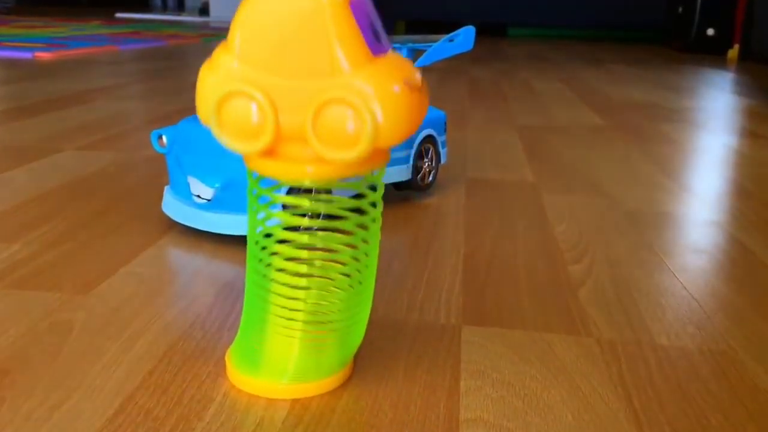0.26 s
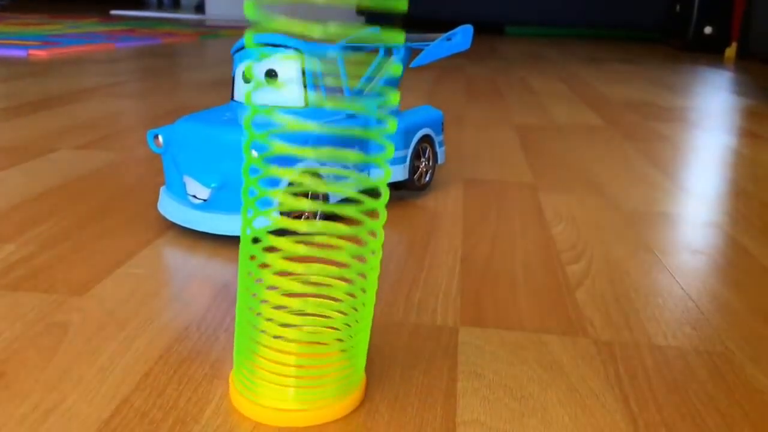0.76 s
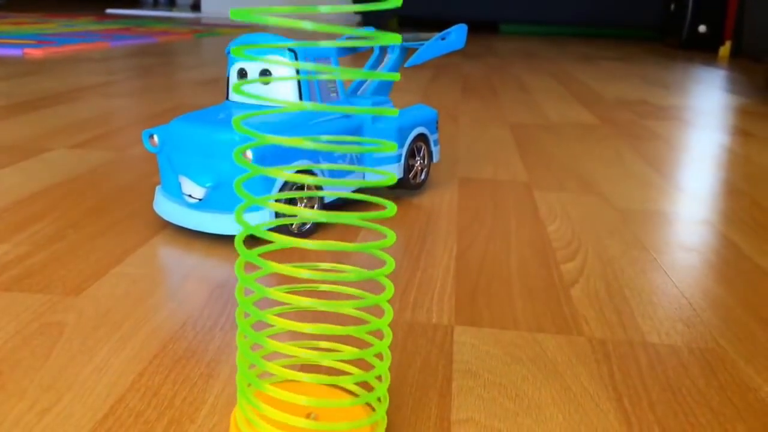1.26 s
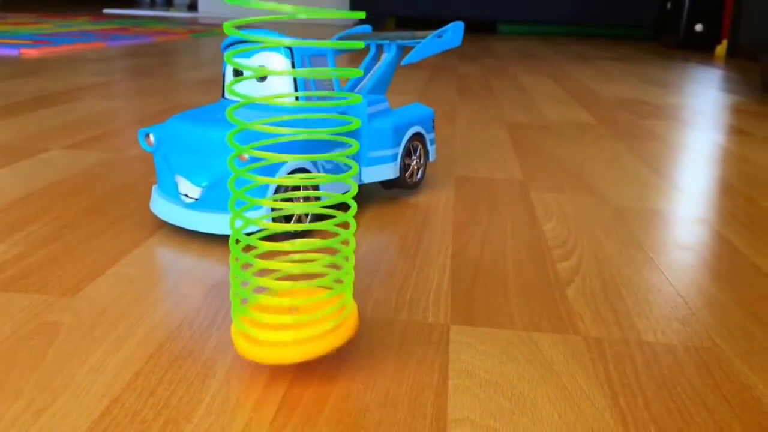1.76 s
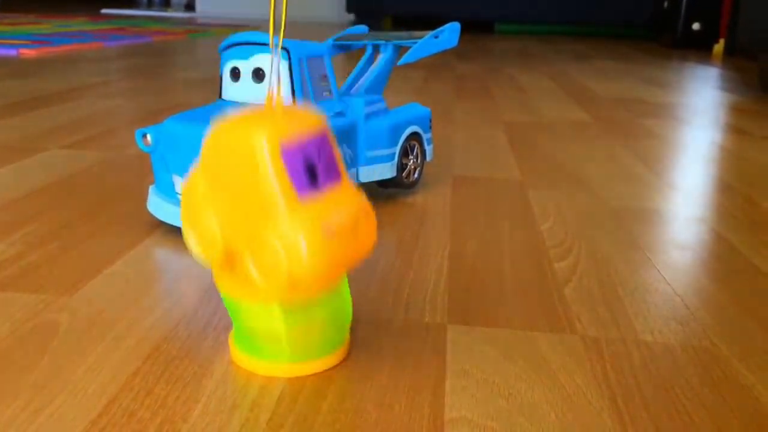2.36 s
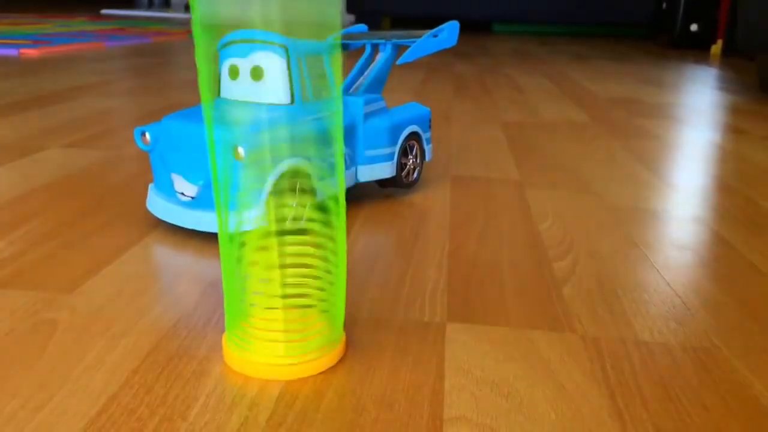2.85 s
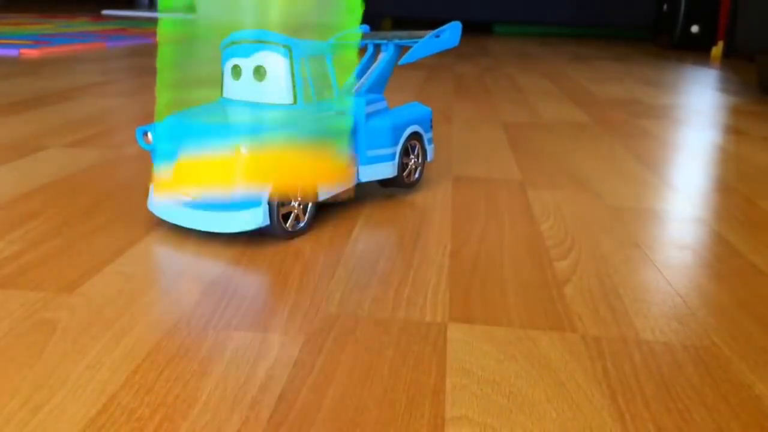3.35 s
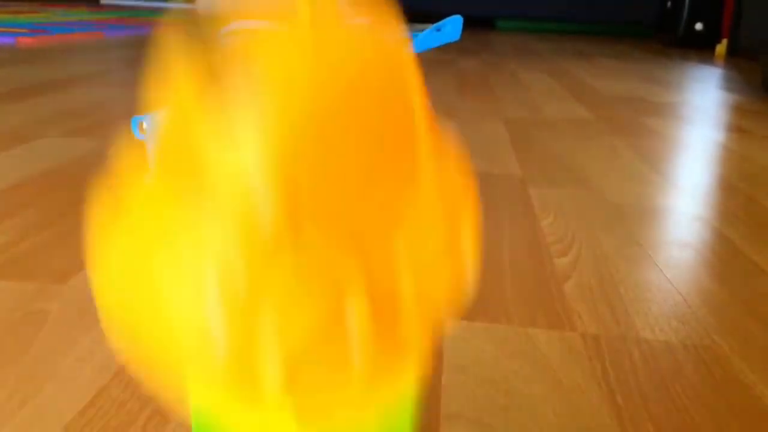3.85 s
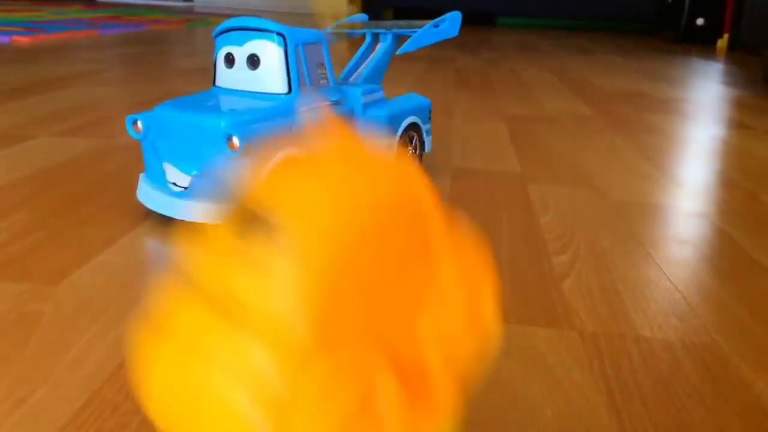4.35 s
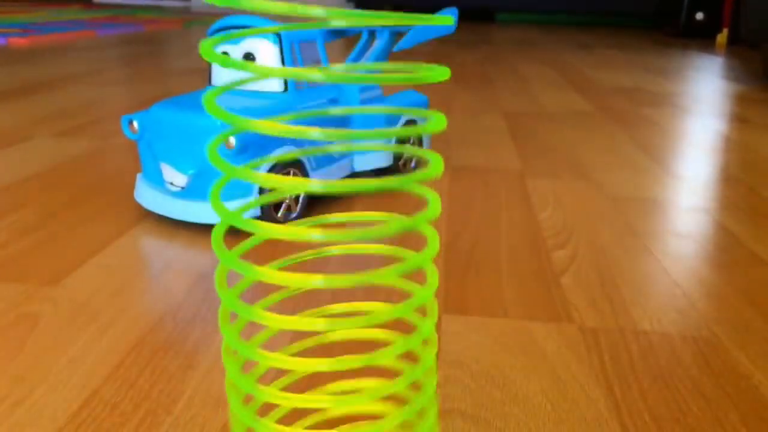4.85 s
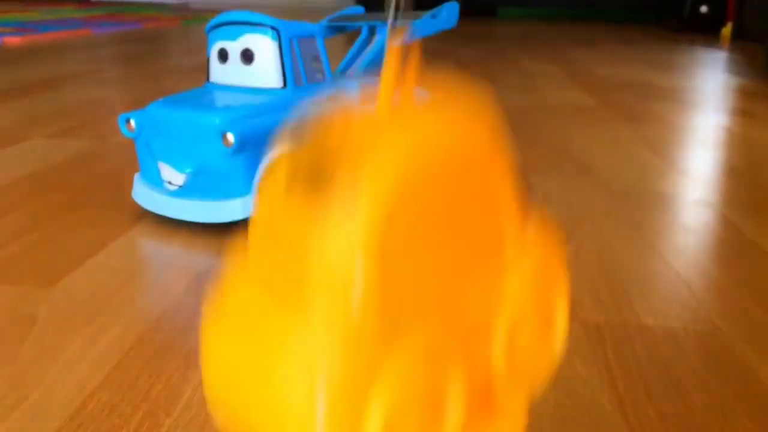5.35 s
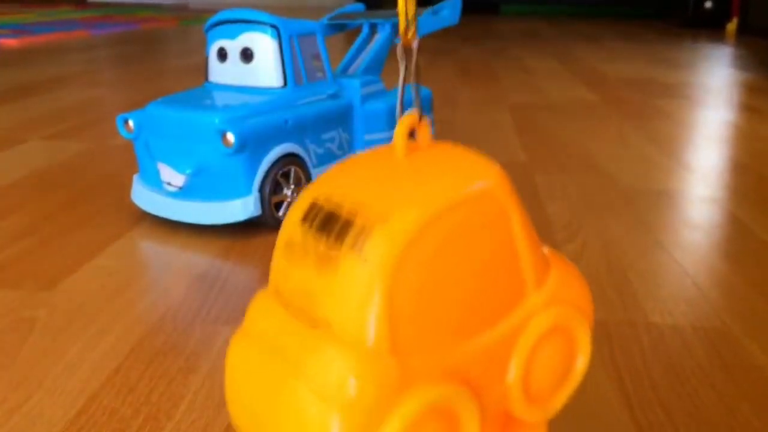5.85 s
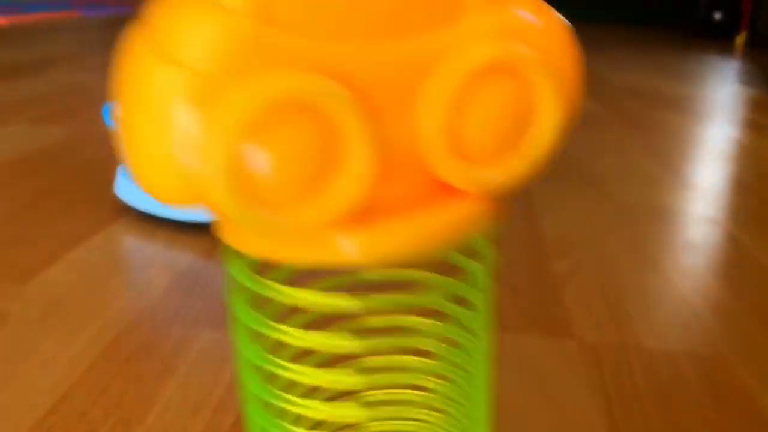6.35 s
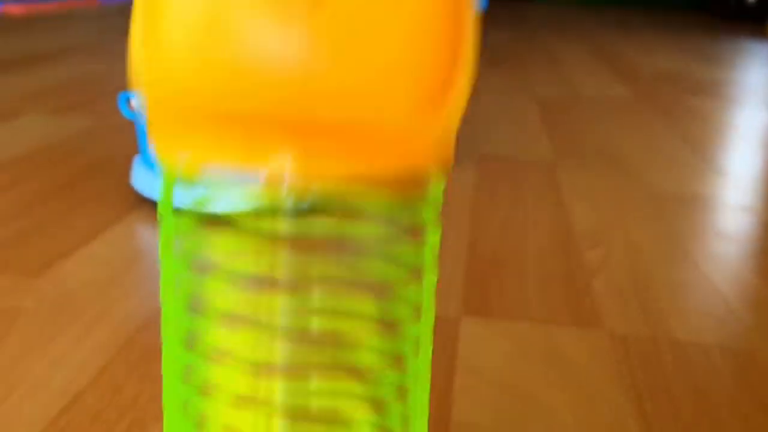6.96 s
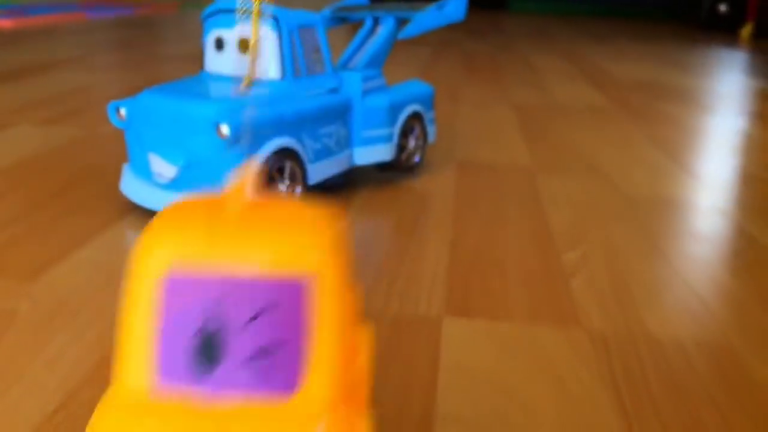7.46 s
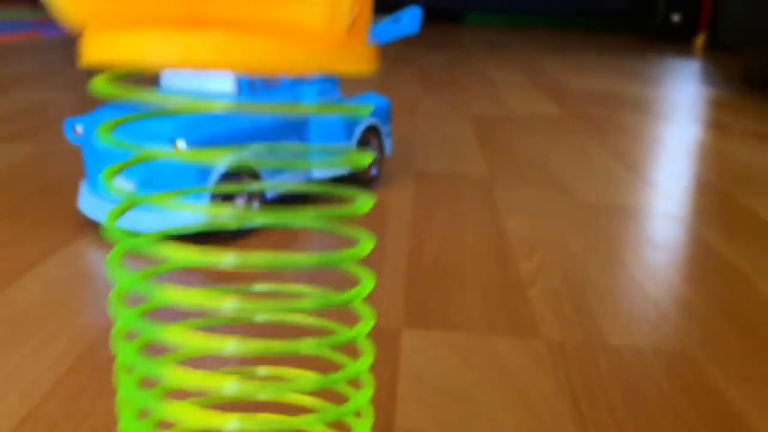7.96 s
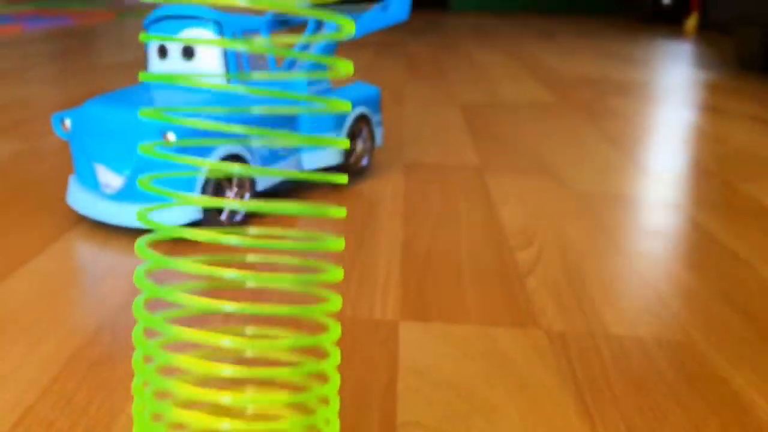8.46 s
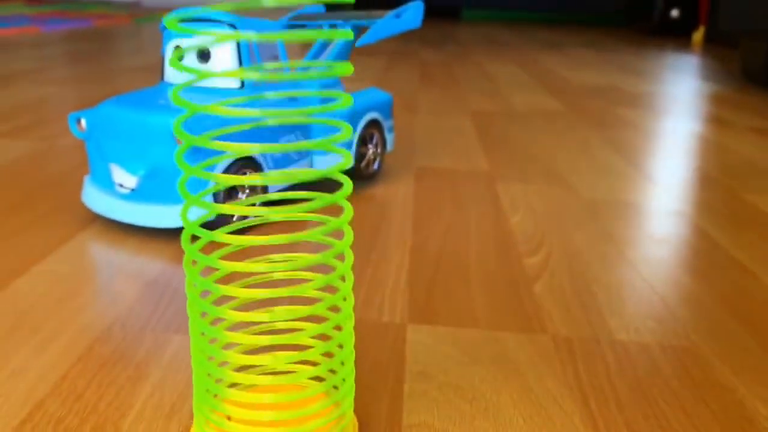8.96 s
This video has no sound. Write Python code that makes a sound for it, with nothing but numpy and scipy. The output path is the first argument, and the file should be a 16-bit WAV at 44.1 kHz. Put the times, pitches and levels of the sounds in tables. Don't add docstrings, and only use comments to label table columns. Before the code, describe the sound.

Close hollow knocks, coil rattles and dragging scrapes of a plastic spring toy on bare boards, in a rumbling room with distant chirps.

```python
import sys
import numpy as np
from scipy import signal
from scipy.io import wavfile
from scipy.ndimage import uniform_filter1d

SR = 44100
rng = np.random.default_rng(int(sys.argv[2]) if len(sys.argv) > 2 else 0)


def linear_from_db(decibels):
    return 10 ** (np.asarray(decibels, float) / 20)


def master_out(mix):
    frames = np.transpose(np.atleast_2d(mix))
    ceiling = np.clip(frames, -1, 1)
    pcm = np.round(ceiling * 32767).astype(np.int16)
    wavfile.write(sys.argv[1], SR, pcm)


N = 406602

# (frequency [Hz], density [dB per Hz])
ROOM_SPECTRUM = [(12, -62.5), (20, -25.5), (38, -34.5), (59, -1), (76, -6), (161, -10), (213, -17.5),
                 (305, -15.5), (351, -29.5), (414, -26.5), (647, -28), (764, -31), (1130, -31),
                 (3340, -51.5), (15400, -61.5)]
# (frequency [Hz], width [Hz], level [dB])
STANDING_WAVES = [(76.6, 11, -41.5), (94, 3.2, -55), (298.2, 64, -60.5), (429, 79, -55.5)]
# (frequency [Hz], time to fall 60 dB [s])
ROOM_DECAY = [(250, 0.3), (1000, 0.4), (4000, 0.23), (14000, 0.2)]

# (frequency [Hz], width [Hz], level [dB])
BASE_MODES = [(580, 170, 2), (476, 88, -6.5), (910, 268, -3.5), (1425, 140, -19), (1871, 1900, -30)]
# (frequency [Hz], width [Hz], level [dB])
SHELL_MODES = [(2450, 970, -2), (3300, 240, -10), (4250, 754, -2), (5900, 3000, -3)]
# (frequency [Hz], width [Hz], level [dB])
GRIT_MODES = [(7300, 5900, -2), (9175, 1100, -10), (11600, 1300, -7.5), (14150, 1300, -17)]

# (time [s], pressure [dB], speed as brightness [dB])
DRAG_PATHS = [
    [(.45, -67, -1), (.55, -52, 1), (.72, -49.5, 0), (.78, -44, 1.5), (1.13, -39, -1), (1.18, -45, 6.5),
     (1.3, -52.5, 10), (1.42, -67, 14)],
    [(2.85, -72, -3), (3.04, -41.5, -6.5), (3.1, -45.5, -16), (3.16, -56, -14)],
    [(6.42, -59, -8.5), (6.5, -47.5, 0.5), (6.7, -47.5, 5), (6.91, -38.5, -0.5), (6.98, -50, 6),
     (7.04, -46.5, 6.5), (7.14, -42, 3.5), (7.22, -65, 4)],
    [(8.18, -57.5, 5), (8.37, -53, -2), (8.41, -42.5, -2.5), (8.47, -36.5, -1), (8.55, -32, -2.5),
     (8.7, -31, -2), (8.84, -34.5, -3.5), (8.93, -42, -4), (9.05, -62, 3)],
]
# (start [s], end [s], frequency [Hz], width [Hz], level [dB])
RUBBED_PARTS = [(0.734, 0.966, 4250, 500, -61), (.84, .89, 6300, 1800, -61), (.9, 1.16, 2400, 450, -54),
                (.97, 1.15, 4350, 600, -57), (1.02, 1.1, 6200, 900, -66), (0.927, 1.09, 9300, 1200, -74),
                (1.143, 1.323, 3200, 500, -52), (1.13, 1.33, 5550, 500, -57),
                (1.088, 1.2, 12000, 2000, -66), (1.1, 1.21, 9350, 1200, -67),
                (1.16, 1.337, 1640, 500, -59.5), (2.485, 2.578, 1630, 497, -42),
                (2.49, 2.573, 2250, 600, -49), (4.446, 4.493, 1200, 700, -45.5),
                (4.472, 4.493, 2150, 700, -45.5), (4.88, 4.946, 3850, 700, -63),
                (8.436, 8.633, 5026, 1300, -52), (8.52, 8.6, 6350, 1000, -60),
                (8.66, 8.85, 8300, 2000, -59), (8.683, 8.805, 4470, 1200, -52),
                (8.77, 8.984, 4250, 498, -60.5), (8.565, 8.62, 11500, 2500, -60),
                (8.399, 8.9, 1250, 700, -44), (2.14, 2.24, 650, 350, -43), (3.82, 3.9, 1900, 900, -33),
                (2.994, 3.12, 596, 347, -48), (5.49, 5.552, 840, 250, -37),
                (5.651, 5.678, 4100, 600, -45.5), (6.5, 6.58, 4000, 1000, -59),
                (6.603, 6.667, 6800, 1000, -65), (6.58, 6.66, 9600, 1000, -67),
                (6.675, 6.95, 2970, 900, -60.5), (6.74, 6.96, 4400, 500, -54),
                (6.765, 6.95, 6560, 2000, -60), (7.04, 7.166, 12200, 1800, -65),
                (7.04, 7.15, 2820, 1300, -55), (7.375, 7.398, 4370, 900, -49),
                (7.372, 7.406, 6500, 1500, -57), (7.415, 7.437, 4430, 700, -55),
                (7.475, 7.51, 4200, 900, -57)]
# (time [s], peak [dB], cavity pitch [Hz], upper body relative level [dB])
BASE_KNOCKS = [(2.06, -13, 540, -13), (2.075, -9.5, 520, -17), (2.082, -15.5, 680, -8.5),
               (2.1, -15, 567, -17), (2.131, -12.5, 537, -16.5), (2.463, -21, 714, -10),
               (2.539, -18.5, 560, -5.5), (3.798, 3.5, 642, -8.5), (3.8065, -6, 950, 4),
               (3.808, 4, 796, -7), (3.852, -5, 720, -9.5), (3.868, -13, 560, -14),
               (3.903, -15.5, 580, -10), (4.007, -16, 593, -16), (4.037, -5, 680, -18.5),
               (4.055, -8.5, 770, -9), (4.0705, -1.5, 610, -7), (4.649, -30, 544, -18),
               (4.703, -14.5, 770, -13.5), (5.222, -8.5, 640, -6), (5.2565, -13.5, 667, -0.5),
               (5.305, -15.5, 720, -11.5), (5.544, -15, 684, -7), (5.584, -12.5, 578, -9.5),
               (7.037, -31, 524, -11.5), (7.332, -15, 580, -6), (7.354, -17, 680, -2.5),
               (7.551, -32.5, 615, -10)]
# (time [s], peak [dB])
BASE_ROCKS = [(2.154, -22.5), (4.717, -20), (5.241, -11.5), (5.251, -7), (5.264, -14), (5.2875, -15.5),
              (5.293, -23), (5.321, -20), (4.084, -21), (4.064, -22), (2.566, -27), (3.09, -38),
              (3.112, -34), (3.136, -35), (5.573, -19), (5.59, -11), (7.351, -15), (5.311, -16),
              (5.318, -20.5), (5.471, -21), (5.501, -32), (5.562, -29), (.892, -25), (1.053, -31),
              (1.128, -27.5), (4.048, -11), (4.075, -3), (6.701, -30), (6.885, -33), (7.765, -25.5),
              (8.403, -25), (8.612, -30)]
# (time [s], peak [dB], pitch [Hz])
BOARD_THUMP = (3.797, -14.5, 85)
# (time [s], peak [dB], shell ring [Hz], treble relative level [dB])
SHELL_CRACKS = [(2.0591, -18.5, 4200, 2), (2.076, -17, 3260, -3.5), (2.0827, -13, 3400, -0.5),
                (2.0916, -27, 2160, -2), (2.1295, -27, 3660, 5.5), (2.4604, -36, 3300, 9.5),
                (2.5298, -21.5, 2300, 2), (3.7977, 5.5, 3910, -7), (3.8049, 8.5, 3130, 2),
                (3.8071, 3, 5100, 0), (3.8194, -6, 3300, -15), (3.9956, -13.5, 3540, -8),
                (4.033, -11, 3860, -1), (4.0432, -7, 4040, -1), (4.0496, -9.5, 3790, -3),
                (4.0689, -6.5, 2160, 3.5), (4.0824, -7, 3650, -15), (4.1043, -11.5, 4010, -4),
                (4.1116, -9, 4400, -5), (4.443, -11, 4290, 0.5), (5.2215, -8, 3910, -8),
                (5.241, -14, 3650, -6), (5.2496, -25.5, 4300, 13.5), (5.2559, -8.5, 4140, -11),
                (5.2875, -26, 3350, 7), (5.3043, -16, 4200, -3), (5.543, -7.5, 3100, -2),
                (5.5882, -18.5, 2240, 1), (7.3296, -15.5, 2570, -2), (7.3542, -26, 2300, 1)]
# (time [s], peak [dB], shell ring [Hz])
COIL_TOUCHES = [(1.155, -33, 3140), (1.292, -30, 3250), (1.3165, -40, 3340), (2.3015, -33, 3480),
                (2.327, -34.5, 3300), (2.939, -47, 3300), (3.1354, -36, 3250), (4.128, -15, 4000),
                (4.134, -14.5, 4110), (4.147, -23, 3900), (4.1652, -14.5, 4260), (4.18, -21, 4250),
                (4.308, -35, 3960), (4.347, -38, 4020), (4.4277, -28, 4350), (4.646, -39, 3420),
                (4.7, -18, 4060), (4.717, -28, 3430), (5.312, -19, 3900), (5.399, -30.5, 3330),
                (5.4294, -32.5, 3520), (5.473, -25, 2050), (5.8222, -34, 4330), (6.4839, -30.5, 3650),
                (6.8823, -46, 5170), (6.951, -33, 2230), (7.026, -26, 3820), (8.404, -39.5, 3880),
                (8.6263, -26, 2660), (8.882, -41, 4370)]
# (time [s], peak [dB])
COIL_SNAPS = [(0.903, -51), (.9324, -41), (1.197, -41), (1.248, -43), (6.746, -41), (6.8174, -41),
              (6.853, -44), (8.2607, -50.5), (8.276, -49), (8.518, -33), (8.644, -38), (8.655, -35),
              (8.667, -44), (8.989, -48)]
# (time [s], peak [dB], ring [Hz])
EDGE_FLICKS = [(1.017, -52, 11500), (1.077, -46, 12500), (1.0944, -50, 12100), (1.106, -45, 10500),
               (1.18, -40, 11500), (1.219, -46, 11500), (1.24, -47, 7200), (1.2604, -50, 7500),
               (1.309, -43, 8900), (1.3264, -43, 6570), (3.012, -51, 6500), (3.023, -50, 6300),
               (3.045, -50, 6000), (3.057, -54, 5800), (3.089, -52, 6200), (3.098, -55, 6400),
               (3.111, -54, 6200), (3.135, -38, 5600), (4.424, -40, 8000), (4.43, -29, 8400),
               (4.436, -28, 8500), (4.443, -31, 8400), (4.481, -41, 12500), (4.524, -44.5, 6500),
               (4.657, -49, 12500), (4.717, -34, 13000), (4.725, -45, 12000), (5.607, -34, 7000),
               (6.624, -48.5, 11500), (6.882, -37, 10500), (6.917, -42, 8500), (6.956, -46, 8500),
               (7.026, -31, 6470), (7.14, -41, 11600), (7.147, -44, 9500), (7.162, -46, 11500),
               (8.431, -44.5, 11600), (8.447, -43, 9800), (8.4914, -44, 11500), (8.57, -44, 10500),
               (8.609, -43, 11500), (8.626, -33, 7500), (8.643, -38, 7800), (8.666, -31, 8000),
               (8.6914, -37, 7800), (8.7046, -33, 7500), (8.7116, -35, 8000), (8.7204, -35, 8000),
               (8.7414, -32, 8000), (8.758, -34, 8040), (8.77, -40, 8000), (8.7794, -44, 7760),
               (8.7994, -39, 9580), (8.8144, -44, 7740), (8.8544, -44, 12500), (8.88, -39, 11500),
               (8.8854, -41, 11000), (8.8924, -44, 11500), (8.9246, -46.5, 12000)]
# (time [s], peak [dB], ring [Hz])
SHELL_TAPS = [(1.1164, -42, 2440), (1.172, -42, 3140), (1.2024, -48, 3150), (1.2554, -43, 3150),
              (1.3794, -50, 4100), (3.0244, -49, 3100), (4.288, -35, 3800), (4.3174, -37, 4050),
              (4.456, -22, 4420), (4.5236, -43, 4300), (4.939, -55, 2190), (5.5325, -20.5, 3160),
              (5.5736, -21, 2000), (5.5837, -22.5, 2220), (5.6064, -35, 3980), (6.507, -50, 3910),
              (6.543, -44, 4380), (6.563, -39.5, 4010), (6.594, -46, 3880), (6.618, -41, 2700),
              (6.689, -44, 3440), (6.786, -43, 2280), (6.9026, -40, 3170), (7.1302, -34.5, 2580),
              (7.146, -36, 4230), (7.2593, -46.5, 2130), (7.3462, -24, 2210), (7.572, -47, 2270),
              (8.397, -48, 4110), (8.4562, -42, 3560), (8.544, -31, 5260), (8.7041, -41, 4120),
              (8.7321, -32, 3000), (8.8293, -41, 4220), (8.8944, -39, 4270), (8.9064, -44, 4240)]
# (time [s], peak [dB], ring [Hz])
COIL_CLINKS = [
    (4.1036, -18, 6470),
    (4.1114, -24, 6540),
    (4.1264, -33, 6390),
    (4.1334, -42, 5900),
    (4.1643, -23, 6530),
    (4.1804, -33, 6500),
]
# (time [s], level [dB], top pitch [Hz], end pitch [Hz], length [s])
BIRD_CHIRPS = [(1.522, -67, 3750, 3150, 0.048), (1.575, -73, 3700, 3200, 0.047),
               (2.676, -68.5, 3460, 3260, 0.04), (3.123, -73, 4350, 3500, 0.051),
               (3.304, -63, 4430, 3650, .045), (3.318, -64, 3840, 3200, 0.046),
               (3.332, -66, 4400, 3900, 0.05), (3.655, -61, 4400, 3620, 0.064),
               (5.115, -70, 4350, 3360, 0.04), (5.738, -65.5, 4170, 3400, 0.056),
               (6.195, -69, 4470, 3890, 0.047), (6.195, -67, 3850, 3400, 0.039),
               (6.225, -64.5, 4500, 3950, 0.04), (6.225, -68.5, 3850, 3330, 0.058),
               (6.315, -68, 4120, 4280, 0.035), (7.949, -66.5, 3890, 3080, 0.069),
               (8.047, -68, 4280, 3420, 0.065)]
# (start [s], length [s], base level [dB], coil level [dB])
COIL_SHIVERS = [
    (2.086, 0.39, -41.5, -51.5),
    (2.57, 0.16, -60, -59.5),
    (4, 0.098, -39, -35),
    (4.093, 0.19, -54, -42.5),
    (4.276, 0.42, -63, -54.5),
    (4.461, 0.68, -51.5, -85),
    (5.24, 0.25, -36.5, -54),
    (5.591, 0.23, -59.5, -59),
    (7.444, 0.17, -80.5, -62),
]
# (peak time [s], build-up [s], dying [s], base level [dB], coil level [dB])
COIL_SLAMS = [(2.545, 0.073, 0.033, -31.5, -41), (3.79, 0.0069, 0.0056, -25, -65),
              (3.815, 0.01, 0.088, -24.5, -19), (3.902, 0.012, 0.22, -38, -38.5),
              (4.045, 0.014, 0.029, -15.5, -23.5), (4.073, 0.015, 0.021, -11.5, -19),
              (4.915, 0.072, 0.029, -41.5, -47), (5.515, 0.029, 0.02, -39.5, -46),
              (5.545, 0.005, 0.026, -24, -29), (5.593, 0.024, 0.015, -22.5, -37.5),
              (5.665, 0.016, 0.013, -52.5, -42), (7.332, 0.019, 0.014, -30, -38.5)]
# (peak time [s], build-up [s], dying [s], base level [dB], shell level [dB])
SHELL_RATTLES = [
    (2.5, 0.014, 0.15, -46, -71),
    (4.2, 0.033, 0.064, -79, -49),
    (4.444, 0.023, 0.048, -41.5, -36),
    (4.65, 0.016, 0.027, -38, -50.5),
    (5.49, 0.012, 0.14, -35.5, -41.5),
    (7.27, 0.016, .025, -41, -62),
    (7.353, 0.013, 0.022, -19.5, -31.5),
    (7.39, 0.011, 0.059, -50.5, -50.5),
    (7.493, 0.017, 0.016, -57.5, -48),
    (7.574, 0.011, 0.0087, -39.5, -53),
]
# (frequency [Hz], width [Hz], depth [0-1])
PORT_DIPS = [(4820, 410, 0.11), (10530, 770, 0.5)]

ROOM_DB, ROOM_ECHO_DB = -37, -16
BIRD_DIRECT_DB, BIRD_YARD_DB, BIRD_FLUTTER, YARD_STRETCH = -8, -5, .65, 2.2
DRAG_WANDER_DB, DRAG_SHELL_DB, DRAG_GRIT_DB, GRIT_PER_SPEED, LUMP_DB = 3., -16.5, -24, 0.5, 2.5
BOUNCE_S, BOUNCE_SWING, BOUNCE_SHARE = .00045, .3, .5
RING_GRAIN_DB, RING_GRAINS_PER_S = 3.5, 400
CAVITY_T60_S, CAVITY_SAG, SAG_S = .03, 0.42, 0.0017
PUSH_S, CAVITY_TAIL = 0.00091, 0.21
ROCK_HZ, ROCK_UPPER_DB = 597, -39
TICK_RISE_S, COIL_EDGE_DB, SNAP_HZ, SNAP_EDGE_DB = .0003, -10.5, 3700, -5
FLICK_WIDTH_HZ, TAP_WIDTH_HZ, CLINK_WIDTH_HZ, PING_T60_S = 3000, 1300, 750, 0.0075
SHIVER_FADE_DB, SHIVER_GRIT_DB = -12.5, -9.5
SLAM_START_DB, SLAM_END_DB = (-11.5, -19), (-9.5, -21.5)
SLAM_GRIT_DB, RATTLE_GRIT_DB = -0.5, -14.5


def evened(x):
    return x / np.sqrt(np.mean(x ** 2) + 1e-20)


def read(points, hz):
    f, value = np.transpose(points)
    return np.interp(np.log(hz + 1), np.log(f + 1), value)


def add(mix, s, sound):
    part = mix[round(s * SR):][:len(sound)]
    part += sound[:len(part)]


def slow(rate):
    knots = rng.standard_normal(4000)
    return np.interp(np.arange(N) * rate / SR, np.arange(len(knots)), knots)


def fixed_mode(x, hz, width):
    r = np.exp(-np.pi * width / SR)
    poles = np.poly(2 * [r * np.exp(2j * np.pi * hz / SR)])
    return 2 * signal.lfilter([(1 - r) ** 2], poles, x).real


def resonate(x, hz, width):
    turn = np.exp(2j * np.pi * np.cumsum(hz * np.ones(len(x))) / SR)
    r = np.exp(-np.pi * width / SR)
    return 2 * (turn * signal.lfilter([1 - r], [1, -r], x / turn)).real


def ring(hz, t60, sag=0.):
    t = np.arange(1500) / SR
    wave = np.sin(2 * np.pi * np.cumsum(hz * (1 + sag * np.exp(-t / SAG_S))) / SR)
    wave = wave * linear_from_db(-60 * t / t60) * (1 - np.exp(-t * hz * 4.1))
    return wave / abs(wave).max()


def room_tone():
    frames, hz = N // 512 + 5, np.fft.rfftfreq(2048, 1 / SR)
    a, b, patches = rng.standard_normal((frames, 1025, 3)).T
    patches = evened(uniform_filter1d(uniform_filter1d(patches, 16, 0), 8, 1))
    spectrum = (a + 1j * b) * linear_from_db(read(ROOM_SPECTRUM, hz)[:, None] + 1.3 * patches)
    rumble = signal.istft(spectrum, nperseg=2048, noverlap=1536)[1][:N]
    out = linear_from_db(ROOM_DB - 3.5) * evened(rumble)
    for hz, width, db in STANDING_WAVES:
        out = out + linear_from_db(db) * evened(fixed_mode(rng.standard_normal(N), hz, width))
    return out


def friction(per_s, spread_db, rub, wander_db, damping=1.8):
    slips = linear_from_db(spread_db * np.minimum(rng.exponential(1, N), 4)) * (rng.random(N) < per_s / SR)
    puffs = evened(signal.lfilter([1], [1, -.93], slips))
    layers = []
    for modes in (BASE_MODES, SHELL_MODES, GRIT_MODES):
        gains = np.array([linear_from_db(db + wander_db * slow(8.7)) for hz, width, db in modes])
        gains /= np.linalg.norm(gains, axis=0)
        drives = (puffs + rub) * rng.standard_normal(gains.shape) * gains
        rung = [fixed_mode(x, hz, damping * width) / np.sqrt(width)
                for x, (hz, width, db) in zip(drives, modes)]
        layers.append(evened(sum(rung)))
    return layers


def off_boards(x):
    late = BOUNCE_S * SR * np.exp(BOUNCE_SWING * uniform_filter1d(slow(5.6), size=4000))
    return x + BOUNCE_SHARE * np.interp(np.arange(N) - late, np.arange(N), x)


def play(tables, layers, fade=0.012):
    out = np.zeros(N)
    for rows in tables:
        s, *levels = np.transpose(rows)
        t = np.arange(s[0], s[-1], 1 / SR)
        sound = sum(linear_from_db(np.interp(t, s, db)) * x[round(s[0] * SR):][:len(t)]
                    for db, x in zip(levels, layers))
        edges = np.minimum(1, np.minimum(t - s[0], s[-1] - t) / fade)
        add(out, s[0], sound * edges)
    return out


def drags():
    return [[(s, db, db + DRAG_SHELL_DB + speed, db + DRAG_GRIT_DB + GRIT_PER_SPEED * speed)
             for s, db, speed in rows] for rows in DRAG_PATHS]


def rubbed_rings():
    out = np.zeros(N)
    drive = rng.standard_normal(N) * linear_from_db(RING_GRAIN_DB * slow(RING_GRAINS_PER_S))
    for s, end, hz, width, db in RUBBED_PARTS:
        part = drive[round(s * SR):round(end * SR)]
        swell = signal.windows.tukey(len(part), .5)
        add(out, s, linear_from_db(db) * evened(fixed_mode(part, hz, width)) * swell)
    return out


def cavity(hz):
    t = np.arange(2000) / SR
    u = t / PUSH_S
    shape = u * np.exp(1 - u) + CAVITY_TAIL * (1 - np.exp(-u)) * linear_from_db(-60 * t / CAVITY_T60_S)
    wave = shape * np.sin(2 * np.pi * np.cumsum(hz * (1 + CAVITY_SAG * np.exp(-t / SAG_S))) / SR)
    return wave / abs(wave).max()


def knocks():
    out = np.zeros(N)
    rows = BASE_KNOCKS + [(*row, ROCK_HZ, ROCK_UPPER_DB) for row in BASE_ROCKS]
    for (s, db, hz, upper_db), (u, v) in zip(rows, rng.random((len(rows), 2))):
        upper = ring(950 + 250 * u, .012, sag=.3) + .35 * ring(1350 + 300 * v, .01)
        boards = 0.03 * ring(300, 0.05) + .2 * ring(390, .015)
        add(out, s, linear_from_db(db - 2.7) * cavity(hz))
        add(out, s, linear_from_db(db) * (linear_from_db(upper_db) * upper + boards))
    s, db, hz = BOARD_THUMP
    add(out, s, linear_from_db(db) * ring(hz, 0.037))
    return out


def ticks():
    out, t = np.zeros(N), np.arange(1500) / SR
    rows = SHELL_CRACKS + [(*row, COIL_EDGE_DB) for row in COIL_TOUCHES]
    rows = rows + [(s, db, SNAP_HZ, SNAP_EDGE_DB) for s, db in COIL_SNAPS]
    noise = rng.standard_normal((len(rows), 2, 1500))
    high = signal.butter(N=2, Wn=[6000, 16000], btype="band", fs=SR)
    burst = (1 - np.exp(-t / TICK_RISE_S)) * (linear_from_db(-60 * t / 0.0043) + 0.085 * linear_from_db(-60 * t / 0.028))
    for (s, db, hz, top_db), (a, b) in zip(rows, noise):
        edge = signal.lfilter(*high, a * burst)
        shell = fixed_mode(b * burst, hz, 1900)
        shell = shell / abs(shell).max() + 0.39 * ring(hz, 0.016)
        add(out, s, linear_from_db(db - 4.5) * shell + linear_from_db(db + top_db) * edge / abs(edge).max())
    return out


def pings():
    out, t = np.zeros(N), np.arange(900) / SR
    kinds = ((EDGE_FLICKS, FLICK_WIDTH_HZ), (SHELL_TAPS, TAP_WIDTH_HZ), (COIL_CLINKS, CLINK_WIDTH_HZ))
    for table, width in kinds:
        for (s, db, hz), noise in zip(table, rng.standard_normal((len(table), 900))):
            ping = fixed_mode(noise * linear_from_db(-60 * t / PING_T60_S), hz, width)
            add(out, s, linear_from_db(db) * ping / abs(ping).max())
    return out


def birds():
    out = np.zeros(N)
    for s, db, top_hz, end_hz, length in BIRD_CHIRPS:
        u = np.arange(0, 1, 1 / (length * SR))
        hz = np.interp(u, [0, .15, .42, 1], [0.9 * top_hz, top_hz, top_hz, end_hz])
        call = linear_from_db(db) * np.sin(2 * np.pi * np.cumsum(hz) / SR) * signal.windows.tukey(len(u), .7)
        for late, echo_db in ((0, 6), (.03, -7), (.055, -9.5)):
            add(out, s + late, linear_from_db(echo_db) * call)
    return out * (1 + BIRD_FLUTTER * slow(250))


def shivers():
    return [[(s + u * length, *(np.array([base, coils, coils + SHIVER_GRIT_DB]) + u * SHIVER_FADE_DB))
             for u in (0, 1)] for s, length, base, coils in COIL_SHIVERS]


def slams(table, grit_db):
    tables = []
    for s, rise, fall, base, coils in table:
        stages = ((s - rise, SLAM_START_DB), (s, (0, 0)), (s + fall, SLAM_END_DB))
        tables.append([(t, base + low, coils + high, coils + high + grit_db) for t, (low, high) in stages])
    return tables


def reverb(x, stretch=0.99):
    taps = np.zeros(SR)
    at = np.arange(100, SR - 20, 20)
    taps[at + rng.integers(0, 20, len(at))] = rng.choice([-1., 1.], len(at))
    hz, t, z = signal.stft(taps, SR, nperseg=256)
    decay = linear_from_db(-60 * t / (stretch * read(ROOM_DECAY, hz))[:, None])
    tail = signal.istft(z * decay, SR, nperseg=256)[1]
    return signal.fftconvolve(x, tail / np.linalg.norm(tail))[:N]


def scene():
    base, shell, grit = friction(per_s=900, spread_db=2., rub=0.7, wander_db=DRAG_WANDER_DB)
    rub = [evened(base * linear_from_db(LUMP_DB * slow(110))), shell, evened(off_boards(grit))]
    coils = friction(per_s=1100, spread_db=3.5, rub=1.0, wander_db=4.5, damping=2.9)
    no_bass = signal.butter(N=2, Wn=330, btype="high", fs=SR, output="sos")
    coils[0] = signal.sosfilt(no_bass, coils[0])
    toy = play(drags(), rub) + rubbed_rings() + knocks() + ticks() + pings()
    toy += play(shivers(), coils)
    toy += play(slams(SHELL_RATTLES, RATTLE_GRIT_DB), coils[:1] + rub[1:], fade=0.0032)
    toy += play(slams(COIL_SLAMS, SLAM_GRIT_DB), coils, fade=.005)
    far = birds()
    near = toy + linear_from_db(ROOM_ECHO_DB) * reverb(toy)
    outside = linear_from_db(BIRD_DIRECT_DB) * far + linear_from_db(BIRD_YARD_DB) * reverb(far, stretch=YARD_STRETCH)
    return (near + outside + room_tone())[None]


def band_limit(x):
    return signal.sosfilt(signal.butter(12, 16680, fs=SR, output="sos"), x)


def record(dry):
    power_db = 10 * np.log10(abs(uniform_filter1d(dry ** 2, size=400)) + 1e-12)
    fall = np.arange(N) * 36.2 / SR
    held_db = np.maximum.accumulate(power_db + fall, axis=1) - fall
    over_db = np.maximum(held_db + 12.0, 0)
    ducked = dry / linear_from_db(0.71 * uniform_filter1d(over_db, size=600, origin=299))
    for hz, width, depth in PORT_DIPS:
        ducked = ducked - depth * resonate(ducked[0], hz, width)
    low_pass = signal.firwin(255, 15750, window=("kaiser", 4), fs=SR)
    band = signal.oaconvolve(ducked, low_pass[None], "same")
    return band_limit(np.clip(band, -1, 1))


dry = scene()
out = record(dry)
master_out(out)
```